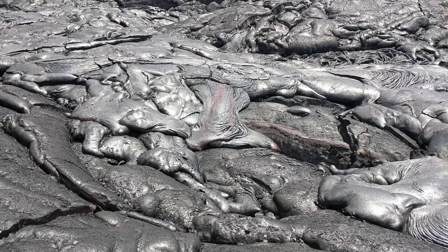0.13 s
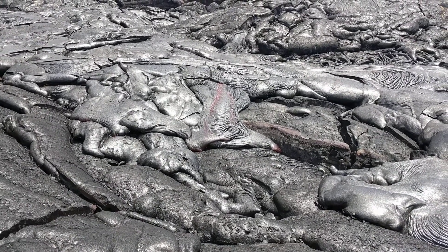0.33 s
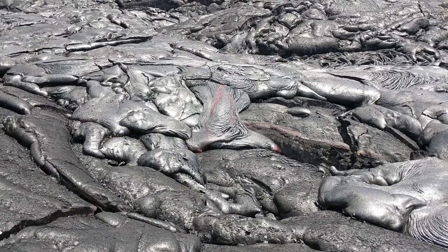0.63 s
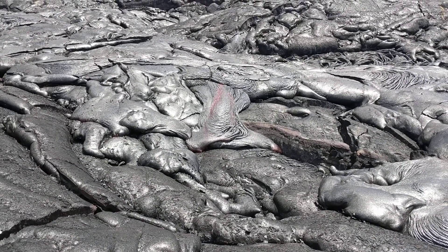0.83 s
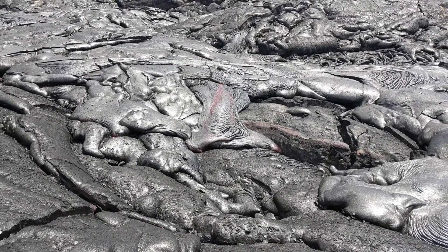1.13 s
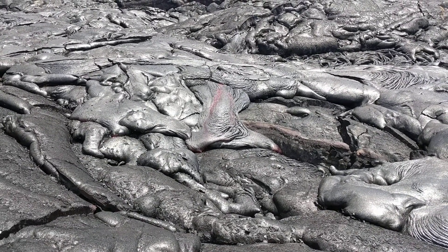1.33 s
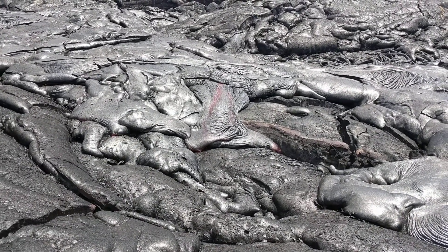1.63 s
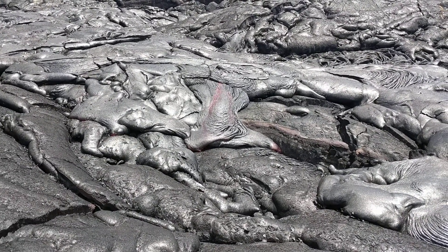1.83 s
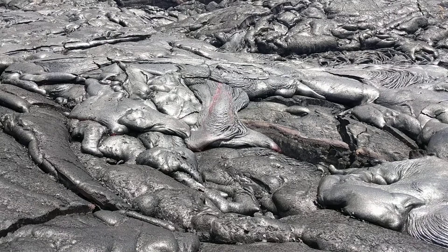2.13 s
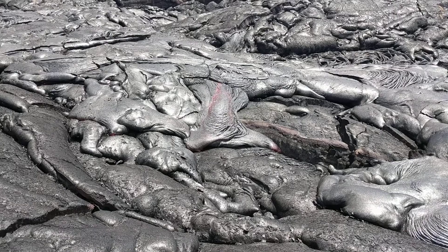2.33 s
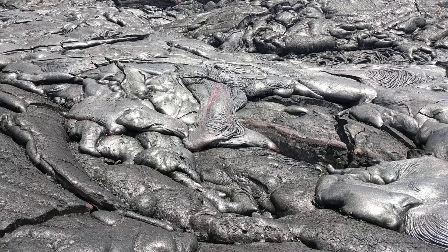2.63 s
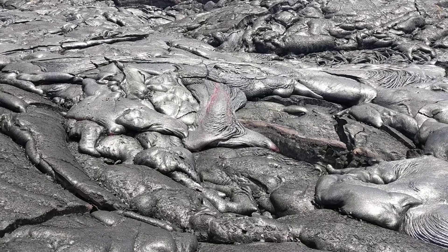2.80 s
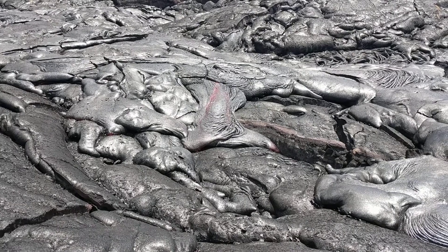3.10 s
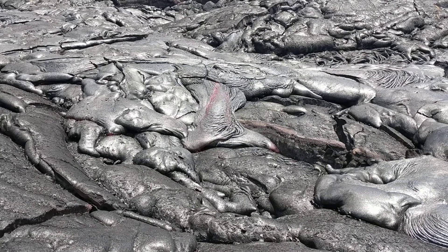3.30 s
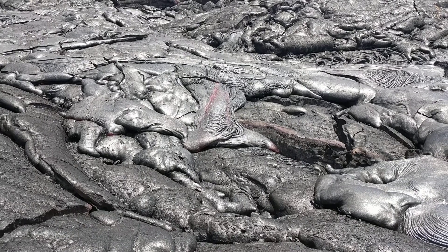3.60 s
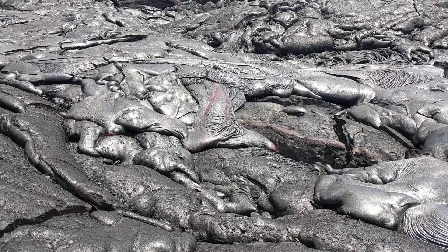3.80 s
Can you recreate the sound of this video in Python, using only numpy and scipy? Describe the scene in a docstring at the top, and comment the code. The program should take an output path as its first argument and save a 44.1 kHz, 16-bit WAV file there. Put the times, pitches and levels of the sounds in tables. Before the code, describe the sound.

Cooling lava crust snaps and crackles sharply over low wind rumble on the microphone.

```python
"""Gusts rumble on the microphone while, close by, the glassy crust of a cooling lava flow snaps.
Each dry, millisecond crack rings crust and shard and bounces off the nearby rock; plates scrape
in stick-slip clicks and small flakes tick in a fine crackle. Out in the open air, single eddies and
pockets of air buffet the microphone. Far wind, a soft hiss and a thin whine lie beneath."""
import sys
import numpy as np
from scipy import signal
from scipy.fft import rfft, irfft, next_fast_len
from scipy.io import wavfile
from scipy.ndimage import uniform_filter1d

SR = 44100
rng = np.random.default_rng(int(sys.argv[2]) if len(sys.argv) > 2 else 0)


def wav_record(signal):
    """Record a signal, one row per channel, as 16-bit PCM in the file named by sys.argv[1]."""
    frames = np.transpose(np.atleast_2d(signal))
    bounded = np.clip(frames, -1, 1)
    # unit amplitude maps onto the largest positive 16-bit level
    quanta = np.round(bounded * 32767).astype(np.int16)
    wavfile.write(sys.argv[1], SR, quanta)


N = 174195


def undb(db):
    """Decibels to gain."""
    return 10 ** (np.asarray(db) / 20)


def unit(x):
    """Scale to rms 1."""
    return x / np.sqrt(np.mean(x ** 2) + 1e-24)


def curve(rows):
    """A table of (s, value) read at every sample."""
    return np.interp(np.arange(N) / SR, *np.array(rows).T)


def shaped(x, gain):
    """Filter by a function of frequency."""
    size = next_fast_len(len(x))
    hz = np.maximum(np.fft.rfftfreq(size, 1 / SR), 1)
    return irfft(rfft(x, size) * gain(hz), size)[:len(x)]


def noise(colour):
    """Noise of rms 1 with a spectrum of (Hz, dB) points."""
    hz, db = np.array(colour).T
    return unit(shaped(rng.standard_normal(N), lambda f: undb(np.interp(np.log(f), np.log(hz), db))))


def steady(x, span_s):
    """Even out the swells of a noise that last longer than span_s."""
    size = max(int(span_s * SR), 2)
    power = uniform_filter1d(uniform_filter1d(x ** 2, size), size)
    return x / np.sqrt(np.maximum(power, 1e-12))


def wander(rate_hz):
    """Smooth random drift of rms 1, mostly slower than rate_hz."""
    return unit(shaped(rng.standard_normal(N), lambda f: 1 / (1 + (f / rate_hz) ** 2)))


def ring(x, hz, q):
    """A resonance with gain 1 at its centre."""
    return signal.lfilter(*signal.iirpeak(min(hz, SR * .45), max(q, .6), fs=SR), x)


def add(out, start_s, x):
    """Mix a short sound in at a time."""
    i = max(int(start_s * SR), 0)
    part = x[:max(N - i, 0)]
    out[i:i + len(part)] += part


# Spectrum of the distant wind. Each row: frequency in Hz, relative level in dB.
FAR_WIND_COLOUR = [(100, 7), (300, 2), (450, 0.5), (700, -6), (1000, -11.5), (1600, -17), (2600, -22.5),
                   (6000, -32)]
# Its slow sink and return. Each row: time in seconds, level in dB.
FAR_WIND_LEVEL = [(0.0, -50), (2.6, -55.5), (3.05, -60.5), (3.3, -54.5), (3.95, -52)]


def far_wind():
    """Air moving far from the microphone makes a low, even rush."""
    return noise(FAR_WIND_COLOUR) * undb(curve(FAR_WIND_LEVEL))


def whine(hz=8930, half_width_hz=61, level_db=-75.5):
    """A narrow band of noise is heard as a thin whine, far back in the scene."""
    band = shaped(rng.standard_normal(N), lambda f: 1 / (1 + ((f - hz) / half_width_hz) ** 2))
    return undb(level_db) * unit(band)


# Spectrum of the crust's fizz. Each row: frequency in Hz, relative level in dB.
FIZZ_COLOUR = [(1500, 4), (2700, -2), (4500, -0.5), (6500, -1.5), (10000, -1.5), (13000, 5.5), (15500, 4.5),
               (16300, -21)]
# Rise and fall of the fizz, which the flakes follow. Each row: time in seconds, relative level in dB.
FIZZ_LEVEL = [(0.0, -62.5), (0.13, -66.5), (0.3, -67), (0.65, -63.5), (0.73, -64), (1.08, -63.5),
              (1.68, -66.5), (2.21, -65.5), (2.39, -62.5), (2.58, -65.5), (2.8, -69), (3.13, -67),
              (3.61, -61), (3.95, -63)]


def fizz(trim_db=-1, flicker_db=5):
    """The crust gives off a soft hiss whose treble flickers."""
    return noise(FIZZ_COLOUR) * undb(curve(FIZZ_LEVEL) + trim_db + flicker_db * wander(rate_hz=55))


def flakes(per_s=260, base_db=-53.5, low_hz=2300, high_hz=15940, ring_s=0.00054, grit=0.54):
    """Small glass flakes tick at random, each ringing briefly, louder where the crust fizzes."""
    out, t = np.zeros(N), np.arange(256) / SR
    for when, size, pitch, damping in rng.random((int(per_s * N / SR), 4)):
        db = base_db + min(-np.log(1 - size), 13)  # large flakes are rare
        hz = low_hz + pitch ** 0.577 * (high_hz - low_hz)  # favours high pitches
        tick = np.sin(2 * np.pi * hz * t) + grit * rng.standard_normal(len(t))
        decay = np.exp(-t / (ring_s * (.5 + damping)))
        add(out, when * N / SR, undb(db) * tick * decay)
    crackle = signal.sosfilt(signal.butter(2, 2500, "highpass", fs=SR, output="sos"), out)
    fizz_db = curve(FIZZ_LEVEL)
    return crackle * undb(fizz_db - fizz_db.mean())


# Strength of the wind right at the microphone. Each row: time in seconds, relative level in dB.
GUST_LEVEL = [(0.0, -30.5), (0.12, -24), (0.18, -25), (0.36, -22), (0.44, -27.5), (0.48, -20),
              (0.51, -30.5), (0.58, -17), (0.71, -28), (.77, -22), (.8, -36), (.83, -22.5), (1.02, -25),
              (1.06, -32.5), (1.08, -28.5), (1.45, -24.5), (1.48, -38.5), (1.52, -23), (1.55, -34),
              (1.59, -33), (1.62, -30.5), (1.74, -32), (1.81, -30.5), (1.85, -36), (1.88, -32.5),
              (2.08, -35.5), (2.13, -40.5), (2.21, -39), (2.28, -31), (2.43, -36), (2.64, -22.5),
              (2.94, -24.5), (3.05, -34), (3.19, -21.5), (3.46, -35), (3.5, -27.5), (3.61, -27.5),
              (3.65, -34.5), (3.69, -30), (3.76, -36), (3.84, -26.5), (3.95, -27)]
# Spectra of its deep rumble and higher flutter. Each row: frequency in Hz, relative level in dB.
RUMBLE_COLOUR = [(20, -61), (32, -32), (45, 1), (62, 4), (88, -0.5), (120, -10.5), (170, -16), (260, -40),
                 (500, -78.5)]
FLUTTER_COLOUR = [(60, -2), (110, 5.5), (160, -1), (240, -9.5), (400, -24), (700, -30), (1500, -44),
                  (3000, -59.5)]


def gusts(rumble_trim_db=-0.5, flutter_base_db=-39, flutter_growth=1.66, usual_gust_db=-25.5):
    """Turbulence rumbles on the microphone; a flutter rides each swell and grows faster in a gust."""
    gust_db = curve(GUST_LEVEL)
    rumble = steady(noise(RUMBLE_COLOUR), span_s=0.1)
    swells = unit(np.abs(signal.hilbert(rumble)) ** 0.83)
    flutter_db = flutter_base_db + flutter_growth * (gust_db - usual_gust_db) + 0.5 * wander(rate_hz=32)
    flutter = swells * steady(noise(FLUTTER_COLOUR), span_s=0.067)
    return rumble * undb(gust_db + rumble_trim_db) + flutter * undb(flutter_db)


# Eddies that swirl over the microphone.
# Each row: centre in seconds, half length in seconds, relative level in dB, cut-off in Hz.
EDDIES = [(0.22, 0.013, -23.5, 316), (0.308, 0.007, -26, 726), (0.315, 0.014, -15, 165),
          (0.356, 0.013, -19, 360), (0.375, 0.0088, -18.5, 413), (0.394, 0.0079, -18.5, 228),
          (0.46, 0.023, -25, 224), (.553, 0.0079, -18, 169), (.588, 0.012, -19.5, 167),
          (0.679, 0.029, -25, 226), (1.001, 0.026, -24.5, 69), (1.095, 0.0042, -27, 135),
          (1.237, .01, -25.5, 177), (1.426, .02, -25, 88), (2.628, 0.0041, -19.5, 422),
          (2.661, 0.0052, -31, 290), (2.861, 0.013, -16, 177), (2.938, 0.016, -19, 75.4),
          (3.215, 0.0022, -21, 150), (3.311, 0.0038, -25.5, 236)]


def eddies(trim_db=-4, low_hz=88, cutoff_order=2.82):
    """Each eddy is a short swell of low turbulence; faster ones reach higher."""
    out, t = np.zeros(N), (np.arange(8192) - 4096) / SR
    for centre, half, db, hz in EDDIES:
        def pink_band(f):
            return 1 / np.sqrt(f * (1 + (f / hz) ** (2 * cutoff_order)) * (1 + (low_hz / f) ** 6))
        swirl = shaped(rng.standard_normal(len(t)), pink_band)
        swell = np.exp(-.5 * (t / half) ** 2)
        gain = undb(db + trim_db) * np.sqrt(np.mean(swell ** 2))
        add(out, centre + t[0], gain * unit(swirl * swell))
    return out


# Knocks of air on the microphone.
# Each row: centre in seconds, relative peak pressure (+ push, - suction), half width in milliseconds.
AIR_KNOCKS = [(0.1403, -0.22, 2.8), (0.259, -0.14, 2.1), (0.2955, -0.24, 3.2), (.3547, 0.3, 0.82),
              (0.3639, 0.4, 5.2), (.369, 0.086, 0.31), (0.371, -0.25, 0.81), (.479, -0.37, 1.88),
              (0.5404, 0.21, 3.3), (0.629, 0.058, 0.45), (0.648, 0.15, 0.52), (1.5208, 0.092, 2.4),
              (1.523, -0.087, 1.8), (2.6227, -0.16, .8), (2.626, 0.12, 0.79), (2.738, -0.34, 1.72),
              (2.854, 0.1, 2.4), (3.13, .11, 2.2), (3.177, -0.18, 1.96), (3.494, -0.078, 2.84)]


def air_knocks(bass_cut_hz=69.4):
    """A pocket of air hits the port: one push or suction, with a swell either side from the bass cut."""
    out, ms = np.zeros(N), (np.arange(4096) - 2048) / SR * 1000
    for centre, peak, half_ms in AIR_KNOCKS:
        pressure = (1 + (ms / half_ms) ** 2) ** -1.5
        pulse = shaped(pressure, lambda f: 1 / (1 + (bass_cut_hz / f) ** 4))
        add(out, centre + ms[0] / 1000, peak * pulse / np.abs(pulse).max())
    return out


# Plates of crust that scrape over each other on the flow. Each row: centre in seconds,
# half length in seconds, relative level in dB, resonance in Hz, its width in Hz.
SCRAPES = [(0.583, 0.011, -58, 11500, 4000), (2.71, 0.017, -48, 12000, 4000),
           (2.834, 0.023, -50, 10300, 4530), (2.871, 0.0088, -51.5, 11200, 900),
           (3.2, 0.022, -54, 10500, 7000), (3.473, 0.016, -50.5, 6960, 8300),
           (3.604, 0.0041, -41, 8900, 7000), (3.67, 0.012, -54, 4440, 6000),
           (3.579, 0.013, -55, 3500, 4000)]


def scrapes(clicks_per_s=330, trim_db=-7):
    """A short swell of tiny stick-slip clicks rings a plate of crust."""
    out, t = np.zeros(N), (np.arange(8192) - 4096) / SR
    for centre, half, db, hz, width in SCRAPES:
        swell = np.exp(-.5 * (t / half) ** 2)
        clicks = rng.standard_normal(len(t)) * (rng.random(len(t)) < clicks_per_s / SR) * swell
        plate = ring(ring(clicks, hz, hz / width), hz, hz / width)
        gain = undb(db + trim_db) * np.sqrt(np.mean(swell ** 2))
        add(out, centre + t[0], gain * unit(plate))
    return out


# Modes of the glassy crust. Each row: frequency in Hz, sharpness as Q.
CRUST_MODES = [(1850, 2.7), (3900, 3.9), (5600, 3.6)]
# The low, middle and high band of a crack. Each row: lower edge in Hz, upper edge in Hz.
CRACK_BANDS_HZ = [(1200, 2400), (3300, 6180), (7400, 15800)]
# Balance of those bands. Each entry: trim in dB.
CRACK_TRIM_DB = [-1, -2.5, -1.5]
# Cracks in the crust near the microphone. Each row: start in seconds, relative levels of the low,
# middle and high band in dB, ring of the shard in Hz.
CRACKS = [(0.1226, -66, -43, -34.5, 15400), (0.1742, -51.5, -48.5, -54, 4300),
          (0.262, -66, -51.5, -43, 13700), (0.3349, -62, -54, -57, 5600), (0.542, -64, -55.5, -47, 13800),
          (0.5746, -67, -53, -39.5, 12000), (0.582, -76, -56, -42, 11500), (0.5888, -68, -72, -39.5, 10300),
          (0.6423, -59.5, -54, -48, 12400), (0.6635, -64, -53, -54, 6050), (0.8379, -62, -58, -43.5, 13600),
          (0.8731, -51, -33, -44, 5400), (0.9562, -82, -59, -46, 13400), (0.9773, -82, -61, -47, 13700),
          (1.0824, -70, -69, -46.5, 12800), (1.1043, -59, -45.5, -41, 13500),
          (1.1608, -69, -66, -49, 14600), (1.197, -50, -46, -34.5, 13300), (1.213, -87, -63, -45.5, 9700),
          (1.2693, -80, -59, -47.5, 7260), (1.296, -79, -53, -62, 5250), (1.3545, -67, -48.5, -38.5, 15500),
          (1.3742, -78, -52.5, -48, 5760), (1.5355, -53, -41, -58, 3900), (1.5422, -81, -72, -43.5, 11500),
          (1.5537, -64, -53.5, -46, 13400), (1.668, -62, -56, -44.5, 12400), (1.817, -56, -76, -70, 2300),
          (1.8822, -83, -53.5, -47, 13500), (1.908, -79, -52, -55, 4970), (2.1882, -42.5, -30, -41, 5540),
          (2.214, -49, -56, -50, 1900), (2.265, -82, -50, -45.5, 10100), (2.3008, -55, -47.5, -52, 4530),
          (2.3327, -67, -52, -39.5, 6970), (2.4831, -51.5, -38, -50, 3280),
          (2.5182, -55, -60, -49.5, 12500), (2.62, -45, -30, -27.5, 13500), (2.649, -71, -55, -53, 14200),
          (2.715, -64, -51, -46, 7600), (2.7422, -56, -55, -52, 12100), (2.8425, -71, -48, -39, 12400),
          (2.929, -89, -89, -47, 11700), (3.0591, -61, -48.5, -41, 8000), (3.1736, -58, -55.5, -51, 13500),
          (3.2075, -80, -52, -45, 15300), (3.2254, -55, -45.5, -35, 9600), (3.4955, -62, -62, -46, 12400),
          (3.601, -77, -49, -49, 9000), (3.6468, -60, -63, -42, 12900), (3.6538, -55.5, -65, -50, 9000),
          (3.6857, -75, -69, -47, 14000), (3.7278, -62, -58, -44, 12700), (3.9346, -56, -53, -46.5, 13800)]


def cracks():
    """Two sharp steps amid tiny slips: each fracture knocks the slab and rings crust and shard."""
    snap_s, crumble_s, crumble_db = 0.00018, 0.0017, -11.5
    first_step, second_step, step_gap_s = 3.34, -2.1376, 0.00062
    thud_hz, thud_q, thud_db, shard_width_hz = 694, 3.9, -6, 1700
    echo_s, echo_db = 0.012, -18
    out, t = np.zeros(N), np.arange(1024) / SR
    decay = np.exp(-t / snap_s) + undb(crumble_db) * np.exp(-t / crumble_s)
    filters = [signal.butter(3, band, "bandpass", fs=SR, output="sos") for band in CRACK_BANDS_HZ]
    for start, *band_db, shard_hz in CRACKS:
        slips = rng.standard_normal(len(t)) * decay
        slips[0] += first_step
        slab = ring(ring(slips, thud_hz, thud_q), thud_hz, thud_q)
        gap_s = step_gap_s * (1 + 0.28 * rng.uniform(-1, 1))
        slips[int(gap_s * SR)] += second_step  # the fracture jumps once more
        crust = sum(ring(slips, hz, q) for hz, q in CRUST_MODES)
        shard = ring(slips, shard_hz, shard_hz / shard_width_hz)
        snap = slips + 1.2 * crust + 2.3 * shard
        low, middle, high = (signal.sosfilt(sos, snap) for sos in filters)
        high = signal.lfilter([1, -0.31], 1, high)  # tilt the top upward
        crack = undb(band_db[0] + thud_db) * unit(slab)
        for db, trim_db, band in zip(band_db, CRACK_TRIM_DB, (low, middle, high)):
            crack += undb(db + trim_db) * unit(band)
        crack *= np.sqrt(0.003 * SR / len(t))  # the energy of 3 ms at those levels
        add(out, start, crack)
        add(out, start + echo_s * (.5 + rng.random()), undb(echo_db) * crack)  # off the nearby rock
    return out


def scene():
    """One microphone in the open air beside the cooling flow."""
    background = far_wind() + fizz() + whine()
    buffeting = gusts() + eddies() + air_knocks()
    crust = cracks() + scrapes() + flakes()
    return (background + buffeting + crust)[None]


def record(dry):
    """The recorder rounds the loudest buffets and cuts the deepest bass and the top."""
    ceiling, bass_cut_hz, top_hz = 0.33, 35, 16250
    rounded = dry[0] / (1 + (dry[0] / ceiling) ** 6) ** (1 / 6)
    thinned = shaped(rounded, lambda f: 1 / (1 + (bass_cut_hz / f) ** 6))
    return signal.sosfilt(signal.ellip(10, .2, 80, top_hz, fs=SR, output="sos"), thinned)[None]


dry = scene()
out = record(dry)
wav_record(out)
```